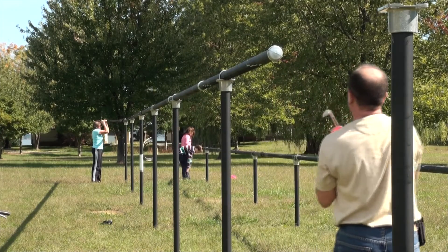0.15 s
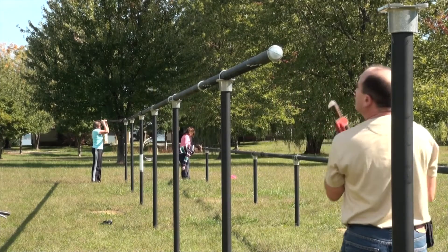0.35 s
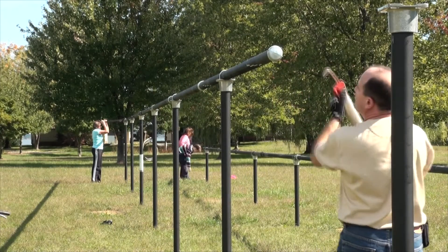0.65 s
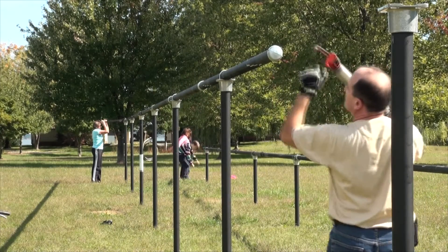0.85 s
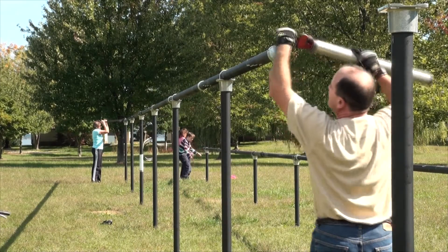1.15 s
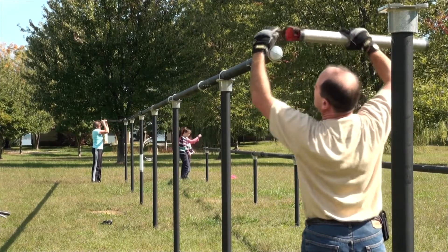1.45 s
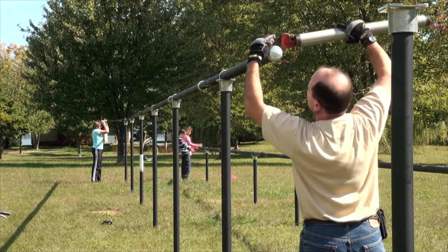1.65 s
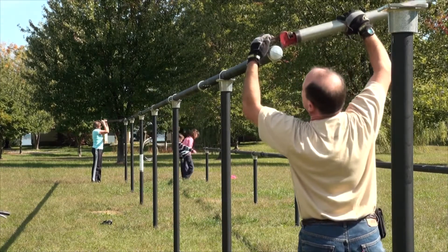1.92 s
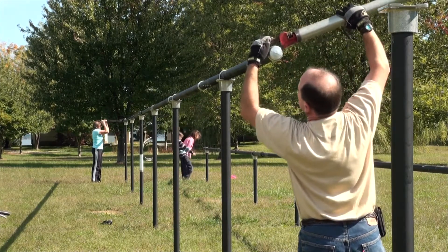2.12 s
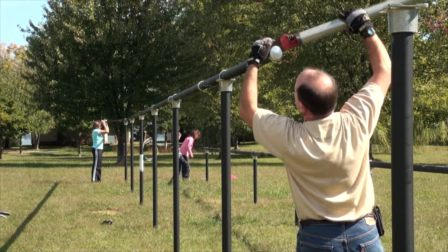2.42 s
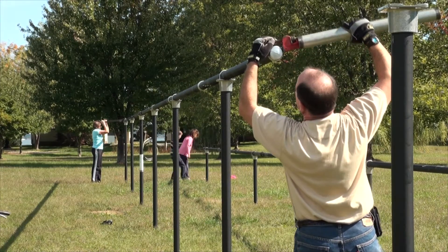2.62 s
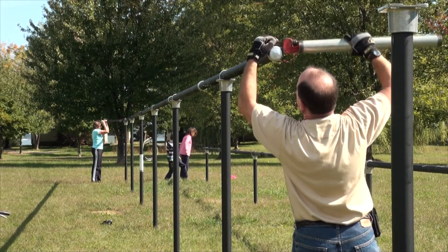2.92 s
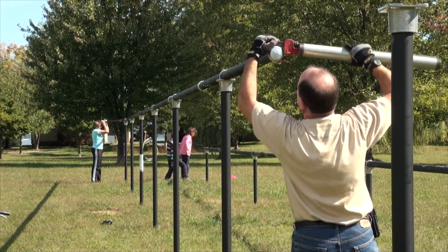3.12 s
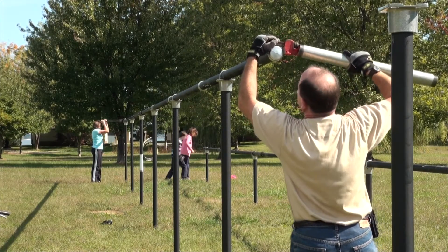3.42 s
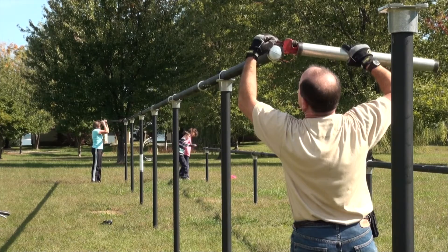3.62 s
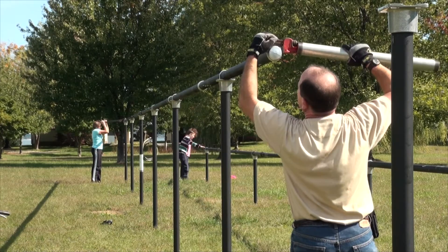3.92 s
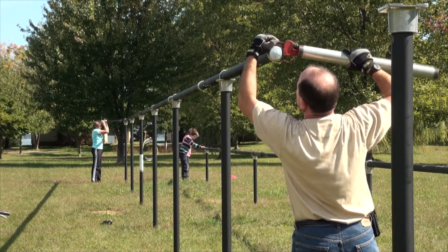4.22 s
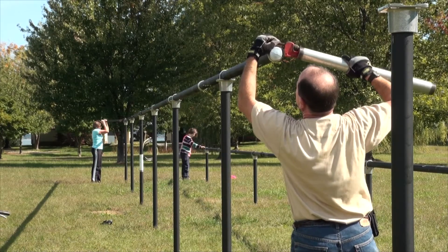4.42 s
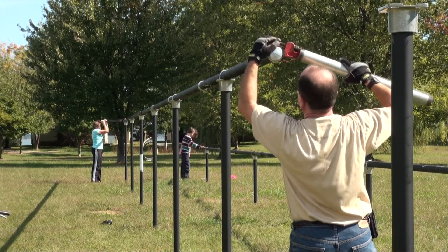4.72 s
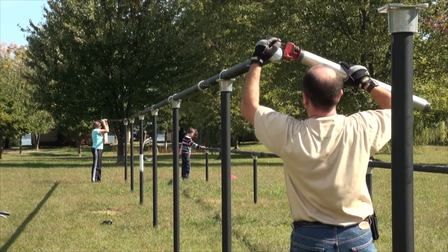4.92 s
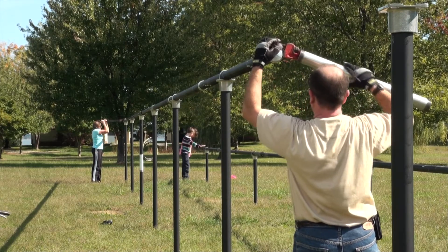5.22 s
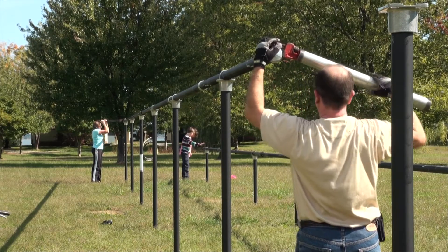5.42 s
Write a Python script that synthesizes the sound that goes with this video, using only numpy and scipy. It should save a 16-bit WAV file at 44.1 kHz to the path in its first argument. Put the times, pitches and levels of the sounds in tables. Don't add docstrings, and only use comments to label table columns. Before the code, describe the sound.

A quiet grassy field: soft airy rustle, slight hiss, and a faint low machine drone around 108 hertz, mostly at right and slowly nearing. Thin, very high crickets pulse in rapid chirps, one near singer pausing from about 2 to 3.5 seconds, another on the left, with a dense far chorus. A distant crow gives faint short caws about every half second from 0.3 to 3.7. At 1.26 a wrench lands on steel pipe with a bright clink; at 1.6-1.7 the jaw scrapes, rattles and seats. Tiny ticks follow, then a sharp double crack at 3.31. Slipping clicks come at 3.75-3.8, softer ones until 4.15. At 4.17 and 4.19 hard bites make by far the loudest clanks, with a brief high singing ring near 2.9 kilohertz. The handle drops with a clink at 4.37; the jaw eases at 4.8 and releases with a tap at 4.83. Crickets and drone continue to the end.

```python
import sys
import numpy as np
from scipy import signal
from scipy.fft import rfft, irfft, next_fast_len
from scipy.io import wavfile
from scipy.ndimage import uniform_filter1d, map_coordinates

SR = 44100
rng = np.random.default_rng(int(sys.argv[2]) if len(sys.argv) > 2 else 0)


def transcribe(signal):
    frames = np.atleast_2d(signal).T
    limited = np.clip(frames, -1, 1)
    pcm = np.round(limited * 32767).astype(np.int16)
    wavfile.write(sys.argv[1], SR, pcm)


def volts(x):
    e = np.asarray(x, float) / 20
    return 10 ** e


N = 245195

# frequency_hz, density_db
AIR_SPECTRUM = [(60, -35), (200, -0.5), (500, 2.5), (1300, 1.5), (3000, -4), (6400, -10.5), (8000, -11),
                (11000, -16), (12000, -41), (16000, -52.5)]
# frequency_hz, correlation (1 = identical)
AIR_CORRELATION = [(300, 0.26), (3000, 0.43), (7000, 0.033)]
# frequency_hz, left_minus_right_db
AIR_BALANCE = [(200, -1), (700, 4.5), (2400, 3), (4400, 3), (9000, 1.5)]
AIR_DB, AIR_SWAY_DB = -56.5, 0.2

# frequency_hz, density_db
DRONE_SPECTRUM = [(15, -38), (25, -14.5), (40, -16.5), (70, -2.5), (90, -10), (135, -14), (200, -25.5),
                  (400, -40), (900, -90)]
DRONE_DB, DRONE_NEARS_DB_PER_S, DRONE_SWAY_DB = -59.5, 0.41, 2.26

# frequency_hz, density_db
HISS_SPECTRUM = [(300, -20), (3000, 0), (14500, 0), (15700, -4)]
HISS_DB = [
    [-86],
    [-64],
]

NEAR_CHIRPS = [.057, .270, .422, .594, .78, 0.978, 1.171, 1.356, 1.591, 1.789, 3.528, 3.687, 3.900, 4.134,
               4.348, 4.566, 4.787, 4.991, 5.195, 5.421]
# time_s, peak_db
NEAR_EFFORT = [(0.0, -49.5), (1.8, -49.5), (3.5, -51.5), (4.7, -48.5), (5.2, -50)]
# first_s, period_s, chirps (count), level_db
LEFT_BOUTS = [
    (.015, .204, 9, -60),
    (1.835, .1925, 12, -61),
    (4.17, .203, 3, -60),
    (4.77, .192, 5, -60),
]
FAR_CHIRPS = 340

CAWS = [-69, -64, -63, -67, -65, -72, -60]
# share_of_call (0 to 1), pitch_hz
CAW_PITCH = [(0, 1210), (.15, 1364), (.33, 1486), (.6, 1440), (.85, 1317), (1, 1200)]
CAW_FIRST_S, CAW_PERIOD_S, CAW_LENGTH_S = .312, .545, 0.12

# start_s, peak_db, crack_db, brightness_db_per_octave
SET_DOWN = [
    (1.258, -27, 2, 0.5),
    (1.2608, -22.5, -1, 1),
    (1.2655, -31.5, 4, 3),
    (1.303, -40, -16, -6.5),
]
NUT = [
    (1.2625, -45, -12, .1),
    (1.626, -31, -10, .1),
]
SCRAPE = [(1.599, -64, -8, 3), (1.618, -37, -18, -12), (1.640, -47, -5, -9), (1.671, -30.5, -18, -12.5),
          (1.680, -38, 0, 5.5), (1.6835, -26, 12, 4.5), (1.691, -33, 5, 4)]
SEAT = [(1.687, -40, 1, -5), (1.7025, -26.5, -5, 1), (1.7085, -31.5, 0, 1), (1.7117, -31.5, 7, 1),
        (2.106, -50.5, 21.5, -8.5), (4.40, -42.5, -6, 4.5)]
SLIP = [(2.34, -51, -9, -10.5), (2.939, -44.5, -15, -5), (2.95, -51, -15, -10), (2.975, -47.5, -12, -8),
        (3.754, -38.5, -4.5, -1), (3.757, -33, -5.5, -5), (3.7605, -28.5, 5, -6), (3.8145, -25, -4.5, -7.5),
        (3.8165, -30.5, -6, -12), (3.938, -45.5, 7, 0), (4.048, -38, -2.5, -16), (4.153, -38, -5.5, -8.5)]
SKIP = [
    (3.310, -17.5, 0.5, -0.5),
    (3.3130, -15.5, -6, -0.29),
    (3.3180, -27, -1, -2),
]
TICK = [
    (3.7765, -37, -6, -3.5),
    (3.782, -46.5, 6.5, 7.5),
    (3.7845, -41, -6, -5),
]
BITE = [
    (4.1652, -4.5, -2.5, 0.54),
    (4.169, -8.5, -8, 0),
    (4.1845, -6, -7, 0.94),
    (4.189, -11, -7, 0),
]
REBOUND = [
    (4.369, -25.5, 1, -1),
    (4.3725, -21.5, -2, -1.5),
]
EASE = [
    (4.797, -35.5, -6, -1),
    (4.801, -31.5, -4, -1),
]
LET_GO = [
    (4.8315, -22.5, -9, 1),
    (4.837, -31.5, -5, -2.5),
]

# frequency_hz, level_db, t60_s
SET_DOWN_MODES = [(873, -1.5, 0.045), (1610, -6, 0.064), (1950, -10.5, 0.17), (2400, -18, 0.073),
                  (2730, -7, 0.037), (2940, -2.5, 0.054), (3370, -7, 0.12), (3480, -7, 0.21),
                  (3880, -8, 0.065), (4474, 1, 0.13), (5410, -24, 0.046), (6210, -6, .05),
                  (7214, -24.5, .1), (7680, -11, 0.071), (8500, -14, .05), (10550, -31, .06)]
NUT_MODES = [(2550, -8, 0.14), (5050, -11.5, 0.036), (6000, -8.5, 0.057), (7800, -20, 0.035),
             (12800, 2, 0.033)]
SCRAPE_MODES = [(1490, -6.5, 0.027), (2380, 3, 0.036), (3030, -1, 0.049), (3600, -4, .04),
                (5080, -8, 0.056), (6030, -2, 0.029), (7800, 0.5, 0.09), (9760, 4, 0.013),
                (11930, -12.5, 0.085), (12900, -10.5, 0.043)]
SEAT_MODES = [(1958, 1, 0.19), (2440, -24, 0.175), (2950, -5, 0.12), (3300, -7, 0.12), (3472, -17, .15),
              (3806, -17.5, 0.12), (4440, -1.5, 0.048), (5260, -15.5, 0.19), (6500, -21.5, 0.2),
              (6900, -44, .15), (9380, -23, 0.11), (10500, -38, 0.16), (11610, -35, .15),
              (12320, -38.5, .1)]
SLIP_MODES = [(1970, -12.5, 0.084), (2440, -26, 0.093), (3080, -3, 0.094), (3180, 4.5, 0.048),
              (3403, -0.5, .06), (3710, -21, 0.17), (4560, -10.5, 0.051), (5130, -11, .07),
              (5270, -12.5, 0.078), (6030, -16, 0.11), (6860, -21.5, 0.39), (8460, -8.5, 0.17),
              (8850, -13, 0.11), (9400, -13, 0.11), (9857, -17, .14), (10360, -16.5, 0.2),
              (10080, -30, .15), (11700, -19.5, 0.25), (12180, -18, .09), (12399, -28.5, .07),
              (13130, -34, 0.146)]
SKIP_MODES = [(1960, -19, 0.13), (2380, -14, .05), (3056, 1.5, 0.042), (3150, 7.5, 0.035),
              (3390, 0.5, 0.055), (3786, -11, 0.14), (4452, -3, 0.049), (4800, 0, .04), (5360, -14, 0.1),
              (6240, -22, .15), (6960, -19.5, .2), (8700, -5, .085), (9070, -15, .08), (9900, -4, .17),
              (10436, -12, .14), (11300, -23.5, .19), (11740, -23, 0.21), (11960, -17, 0.091),
              (12360, -15, .07)]
TICK_MODES = [(1430, 1, 0.015), (1932, -7, .08), (2400, -4, 0.022), (5230, -10.5, .07), (10260, -9, 0.018),
              (13500, -10, .01)]
REBOUND_MODES = [(2110, -15, 0.23), (3000, 3, 0.088), (3130, 6, 0.037), (3370, -5, 0.11), (4460, 2, 0.032),
                 (4440, -22, 0.46), (5243, -23, 0.25), (6185, -18, 0.25), (7020, -26, .29),
                 (8990, -9, 0.14), (9700, -22, 0.34), (10180, -17, .18), (11100, -26, .24),
                 (11900, -24, .2), (12330, -30, .2)]
EASE_MODES = [(823, -11.5, .15), (1950, -4, 0.37), (2820, -3, 0.073), (2960, -3, 0.1), (3100, 4, .05),
              (3327, -8, .15), (3450, -6, .15), (3750, -10, 0.11), (4500, -5, 0.058), (5303, -13, .07),
              (6239, -23, .1)]
LET_GO_MODES = [(189, -17.5, 0.42), (460, -3.5, 0.23), (832, -1, 0.17), (1075, -13, 0.23), (1540, -22, .3),
                (2030, -18, 0.0875), (2846, 5, 0.073), (3130, 14.5, 0.029), (3063, -8, .3),
                (3455, -4, 0.11), (3813, 2.5, 0.19), (5180, -13.5, 0.2), (7940, -8, 0.054),
                (8650, -12, 0.1), (9846, -17.5, 0.36), (10308, -25, .07), (10800, -17, 0.38),
                (11000, -23, 0.3), (11610, -19, 0.27), (12340, -23, .2), (14170, -23, .15)]
BITE_HZ = [780, 1430, 1957, 2374, 2998, 3091, 3343, 3466, 4416, 4455, 5250, 5292, 6181, 7205]
BITE_HIGH_HZ = [7560, 8419, 8766, 9072, 9400, 9555, 9841, 10348, 10960, 11670, 12330, 12790, 13110, 13890]
# level_db, t60_s
BITE_LEVELS = [(-16, 0.032), (-23, 0.051), (-7.5, 0.11), (-11, 0.064), (-5, 0.19), (2, 0.077),
               (-6.5, 0.098), (-14.5, 0.26), (-1.5, 0.084), (-2, 0.15), (-6, 0.074), (-6.5, 0.084),
               (-15, 0.1675), (-20, 0.37), (-27, 0.18), (-14.5, .17), (-11, 0.15), (-6, 0.073),
               (-13.5, 0.27), (-22, 0.132), (-23, 0.136), (-10, 0.095), (-17, 0.25), (-23.5, 0.2),
               (-23.5, 0.13), (-31, 0.15), (-28, 0.22), (-37, 0.11)]

# frequency_hz, density_db
CRACK_SPECTRUM = [(500, -30), (1800, -3.5), (3200, 8.5), (5000, 2), (9000, -7), (13000, -15), (15000, -33)]
# frequency_hz, density_db
RAIL_SPECTRUM = [(100, -41), (190, 3), (300, -2.5), (500, -2.5), (850, 1.5), (1500, -0.5), (3000, -5),
                 (6000, -15), (15000, -30)]
# frequency_hz, t60_s
RAIL_DECAY = [(200, 0.39), (800, 0.39), (3000, 0.28), (10000, 0.1)]
CHOKE = 0.18
RAIL_GROWS, RAIL_DULL = 0.21, 0.26
SCATTER_DB, FLUTTER = 1.0, 0.3

# frequency_hz, level_db, t60_s
TUBE_MODES = [(2884, -32.5, 1.5), (6945, -33.5, 0.29), (4300, -56, 0.65), (5300, -50, .4)]
# start_s, level_db, overtones_db
TUBE_BLOWS = [
    (1.26, -30.5, -15),
    (1.70, -26.5, -15),
    (3.313, -30, 10),
    (4.174, -6.5, 13),
    (4.367, -52, 31),
    (4.832, -26.5, -15),
]

# frequency_hz, left_minus_right_db
WRENCH_BALANCE = [(60, -19.0), (110, -17.0), (200, -38), (380, -25), (700, -5.5), (1290, -5), (2380, -4),
                  (4400, -7.5), (8120, -6.5), (15000, -0.5)]
# frequency_hz, t60_s
MEADOW_DECAY = [(300, 0.41), (3000, 0.55), (12000, 0.41)]
ECHO_DB = -25


def unit(x):
    return x / np.sqrt(np.mean(x ** 2) + 1e-20)


def along(points, hz):
    f, value = np.transpose(points)
    return np.interp(np.log(hz + 1), np.log(f + 1), value)


def wobble(rate):
    knots = rng.standard_normal(int(N * rate / SR) + 4)
    return map_coordinates(knots, [np.arange(N) * rate / SR])


def filtered(x, response):
    size = next_fast_len(x.shape[-1] + 8192)
    spectrum = rfft(x, size) * response(np.fft.rfftfreq(size, 1 / SR))
    return irfft(spectrum, size)[..., :x.shape[-1]]


def dying(spectrum, decay, channels):
    noise = rng.standard_normal((channels, SR // 2))
    hz, t, z = signal.stft(noise, SR, nperseg=512)
    level_db = along(spectrum, hz)[:, None] - 60 * t / along(decay, hz)[:, None]
    x = signal.istft(z * volts(level_db), SR, nperseg=512)[1]
    return x[:, :SR // 2] / np.std(x[:, :512])


def add(track, s, x):
    k = max(round(s * SR), 0)
    track[..., k:k + x.shape[-1]] += x[..., :max(N - k, 0)]


def air():
    z = signal.stft(rng.standard_normal((2, N)), nperseg=512)[2]
    patches = uniform_filter1d(rng.standard_normal(z.shape[1:]), 5, 0)
    patches = uniform_filter1d(patches, 10, 1)
    pair = signal.istft(z * volts(2.08 * unit(patches)), nperseg=512)[1][:, :N]

    def mid_side(f):
        angle = np.arccos(np.clip(along(AIR_CORRELATION, f), -1, 1)) / 2
        return volts(along(AIR_SPECTRUM, f)) * [np.cos(angle), np.sin(angle)]

    mid, side = filtered(pair, mid_side)
    ears = np.array([mid + side, mid - side])
    leaning = filtered(ears, lambda f: volts(np.outer([.5, -.5], along(AIR_BALANCE, f))))
    return volts(AIR_DB + 1.5 + AIR_SWAY_DB * wobble(1.497)) * unit(leaning)


def drone():
    db = DRONE_DB + DRONE_NEARS_DB_PER_S * np.arange(N) / SR + DRONE_SWAY_DB * wobble(3.4)
    rumble, other = filtered(rng.standard_normal((2, N)), lambda f: volts(along(DRONE_SPECTRUM, f)))
    firing_hz = 108.5 + 1.34 * wobble(4.9)
    tone = volts(0.5 + 0.94 * wobble(6.1)) * np.sin(2 * np.pi * np.cumsum(firing_hz) / SR)
    right = volts(db + 3.5) * (unit(rumble) + tone)
    left = volts(-20.5) * right + volts(-78.0) * unit(other)
    return np.array([left, right])


def hiss():
    noise = rng.standard_normal((2, N))
    return volts(HISS_DB) * unit(filtered(noise, lambda f: volts(along(HISS_SPECTRUM, f))))


def chirp(count, low_hz, high_hz, pulse_hz, lag, blur):
    u = np.linspace(0, 1, round(count / pulse_hz * SR))
    hz = low_hz + (high_hz - low_hz) * np.minimum(1, 1.625 * u)
    phase = 2 * np.pi * np.cumsum(hz) / SR
    rasp = unit(uniform_filter1d(rng.standard_normal((2, len(u))), 45))
    strokes = np.abs(np.sin(np.pi * count * u)) ** 2.2
    swell = np.minimum(1, 0.44 + 2.7 * u)
    tone = np.sin(phase + blur * rasp[1] + np.array([[0], [lag]]))
    return strokes * swell * (1 + 0.12 * rasp[0]) * tone


def crickets():
    x = np.zeros((2, N))
    for s in NEAR_CHIRPS:
        db = np.interp(s, *np.transpose(NEAR_EFFORT))
        call = chirp(count=7, low_hz=8920, high_hz=9366, pulse_hz=149.0, lag=1.62, blur=0.29)
        add(x, s, volts(db + 5.5) * call)
    for first_s, period_s, chirps, bout_db in LEFT_BOUTS:
        for k in range(round(chirps)):
            db = bout_db + 1.4 * rng.standard_normal() + np.array([[7], [-3]])
            call = chirp(count=8, low_hz=10060, high_hz=9940, pulse_hz=146, lag=2.16, blur=0.32)
            add(x, first_s + k * period_s - .028, volts(db) * call)
    for k, (late, pitch, size, side, lag) in enumerate(rng.random((FAR_CHIRPS, 5))):
        hz = 8000 + 1700 * pitch
        call = chirp(count=8, low_hz=hz, high_hz=hz + 300, pulse_hz=135 + 20 * side,
                     lag=2 * np.pi * lag, blur=0.62)
        db = -61.5 + 4.1 * size + (side - 0.35) * np.array([[-5], [5]])
        add(x, (k + 2 * late) * N / SR / FAR_CHIRPS, volts(db) * call)
    return x


def crow():
    x = np.zeros(N)
    share, hz = np.transpose(CAW_PITCH)
    u = np.linspace(0, 1, round(CAW_LENGTH_S * SR))
    glide_hz = uniform_filter1d(np.interp(u, share, hz), 500)
    phase = 2 * np.pi * np.cumsum(glide_hz) / SR
    voice = np.sin(phase) + volts(-18) * np.sin(2 * phase) + volts(-20) * np.sin(3 * phase)
    for k, db in enumerate(CAWS):
        add(x, CAW_FIRST_S + k * CAW_PERIOD_S, volts(db + 2.5) * voice * np.sin(np.pi * u) ** 0.45)
    return x * volts(1.6 * wobble(39.77)) * volts(np.array([[-3], [0]]))


def jaw_ring(modes, tilt_db, damping, grip, t):
    hz, db, t60 = np.transpose(modes)[:, :, None]
    ears = np.array([1, -1])[:, None, None]
    size, phase, turn, lean = rng.standard_normal((4, len(modes), 1))
    level = db + tilt_db * np.log2(hz / 3000) + SCATTER_DB * size
    level = level - 60 * t * damping / t60 - 12 * (t / grip) ** 4
    chatter = unit(uniform_filter1d(rng.standard_normal(level.shape), 150))
    beam = volts(0.6 * lean * ears)
    wave = beam * np.sin(2 * np.pi * hz * t + 0.88 * phase + 0.2 * turn * ears)
    return np.sum(volts(level) * (1.5 + FLUTTER * chatter) * wave, 1) / np.sum(volts(db)) * 2


def steel_crack(crack_db, tilt_db, damping, t):
    noise = rng.standard_normal((2, len(t)))
    mid, side = filtered(noise, lambda f: volts(along(CRACK_SPECTRUM, f) + tilt_db * np.log2(f / 3000 + 0.11)))
    crack = unit(mid + np.outer([.3, -.3], side))
    snap = volts(crack_db - 8 - 60 * t * damping / 0.016)
    small_modes = volts(crack_db - 19 - 60 * t * damping / 0.16)
    return crack * (snap + small_modes)


def rail_rumble():
    near, spread = dying(RAIL_SPECTRUM, RAIL_DECAY, channels=2)
    onset = 1 - np.exp(-np.arange(SR // 2) / SR / 0.0013)
    return (near + np.outer([.3, -.3], spread)) * onset


def contacts(events, modes, rise, grip, damp, rail_db):
    x, t = np.zeros((2, N)), np.arange(SR // 5) / SR
    for s, peak_db, crack_db, tilt_db in events:
        damping = damp * volts(CHOKE * crack_db)
        struck = jaw_ring(modes, tilt_db, damping, grip, t) + steel_crack(crack_db, tilt_db, damping, t)
        add(x, s, volts(peak_db) * struck * (1 - np.exp(-t / rise)))
        rumble_db = rail_db - 9 + RAIL_GROWS * (peak_db + 29) - RAIL_DULL * tilt_db
        add(x, s, volts(rumble_db) * rail_rumble())
    return x


def tube():
    x, t = np.zeros(N), np.arange(SR) / SR
    partials = [volts(db - 60 * t / t60) * np.sin(2 * np.pi * hz * t) for hz, db, t60 in TUBE_MODES]
    first, overtones = partials[0], sum(partials[1:])
    for s, db, over_db in TUBE_BLOWS:
        add(x, s, volts(db) * (first + volts(over_db) * overtones) * (1 - np.exp(-t / 0.016)))
    return x * volts(2.12 * wobble(25))


def wrench():
    bite_modes = np.column_stack([BITE_HZ + BITE_HIGH_HZ, BITE_LEVELS])
    x = contacts(SET_DOWN, SET_DOWN_MODES, rise=0.0017, grip=0.099, damp=1.3, rail_db=-41.0)
    x += contacts(NUT, NUT_MODES, rise=0.00095, grip=0.043, damp=1.7, rail_db=-40.5)
    x += contacts(SCRAPE, SCRAPE_MODES, rise=0.00102, grip=.05, damp=1.17, rail_db=-37)
    x += contacts(SEAT, SEAT_MODES, rise=0.0024, grip=0.064, damp=0.93, rail_db=-49.0)
    x += contacts(SLIP, SLIP_MODES, rise=0.0006, grip=.09, damp=1.74, rail_db=-51.5)
    x += contacts(SKIP, SKIP_MODES, rise=0.00045, grip=0.17, damp=1.41, rail_db=-47.5)
    x += contacts(TICK, TICK_MODES, rise=0.0003, grip=0.06, damp=1.34, rail_db=-41)
    x += contacts(BITE, bite_modes, rise=.0012, grip=.082, damp=1.2, rail_db=-47)
    x += contacts(REBOUND, REBOUND_MODES, rise=0.00093, grip=0.15, damp=1.5, rail_db=-43.5)
    x += contacts(EASE, EASE_MODES, rise=0.0015, grip=0.052, damp=1.1, rail_db=-47)
    x += contacts(LET_GO, LET_GO_MODES, rise=0.00091, grip=0.13, damp=1.53, rail_db=-37.5)
    x += tube()
    x = filtered(x, lambda f: volts(np.outer([.5, -.5], np.clip(along(WRENCH_BALANCE, f), -7, 7))))
    tail = dying([(100, 6), (15000, 2.5)], MEADOW_DECAY, channels=2)
    delayed = np.pad(x, ((0, 0), (400, 0)))
    echo = signal.fftconvolve(delayed, tail / np.linalg.norm(tail[0]), axes=1)[:, :N]
    return x + volts(ECHO_DB) * echo


def scene():
    return air() + drone() + hiss() + crickets() + crow() + wrench()


def low_pass(x):
    return signal.sosfilt(signal.butter(12, 16310, fs=SR, output="sos"), x)


def record(dry):
    soft = dry / (1 + np.abs(dry / .93) ** 6) ** (1 / 6)
    mix = filtered(soft, lambda f: f < 15760)
    return low_pass(mix)


dry = scene()
out = record(dry)
transcribe(out)
```